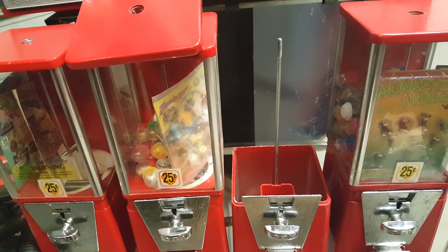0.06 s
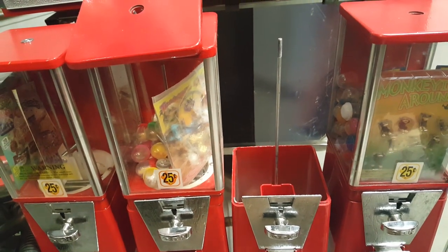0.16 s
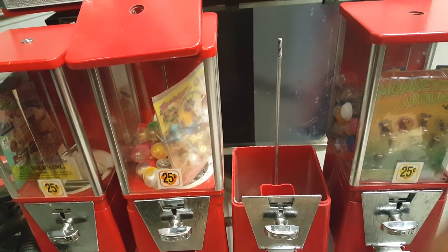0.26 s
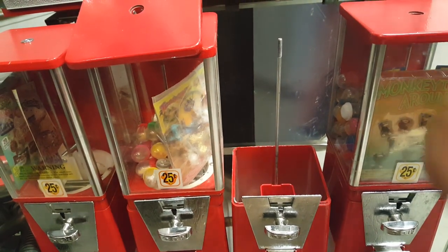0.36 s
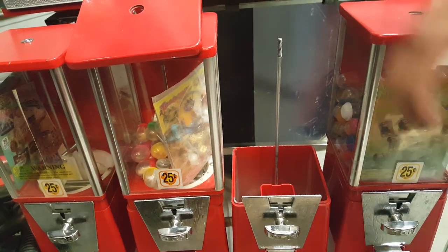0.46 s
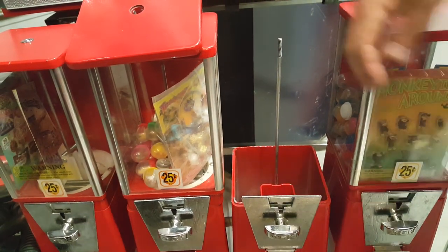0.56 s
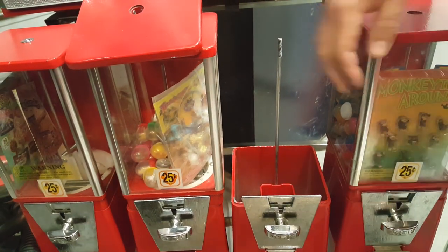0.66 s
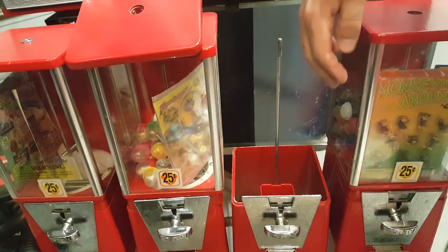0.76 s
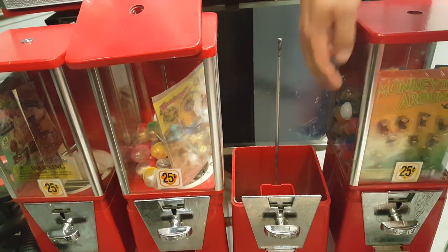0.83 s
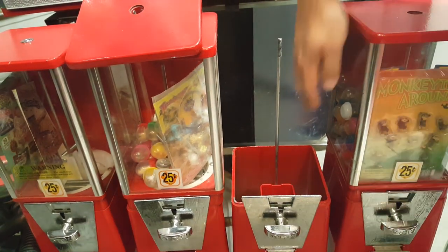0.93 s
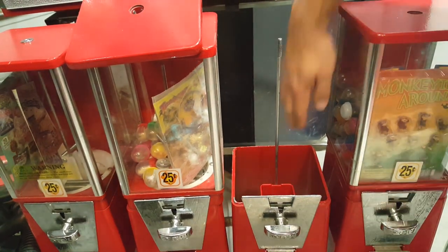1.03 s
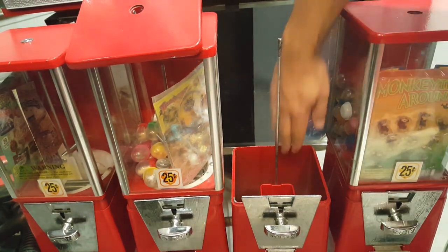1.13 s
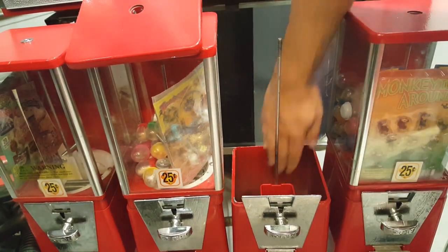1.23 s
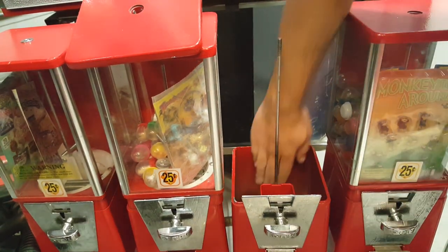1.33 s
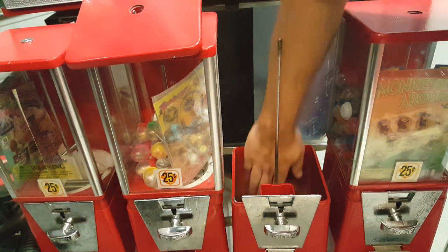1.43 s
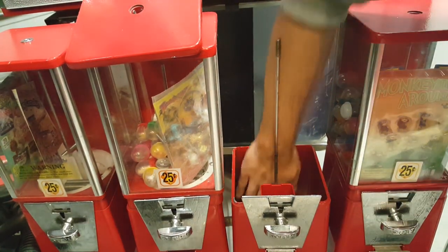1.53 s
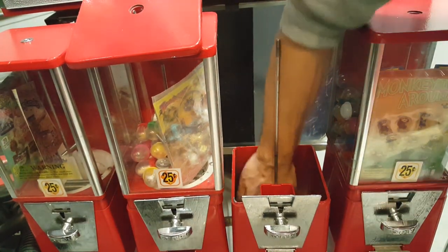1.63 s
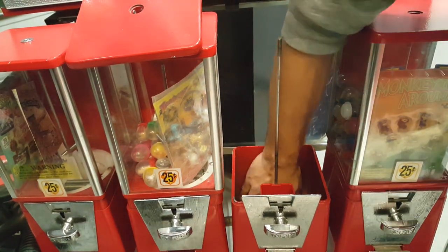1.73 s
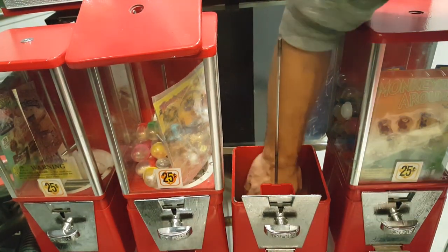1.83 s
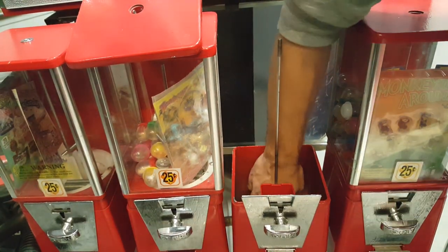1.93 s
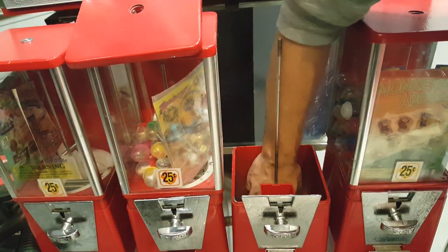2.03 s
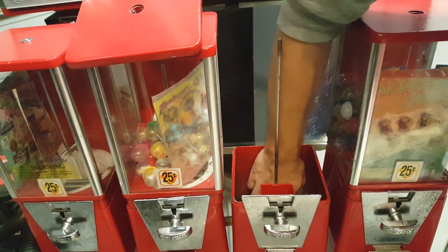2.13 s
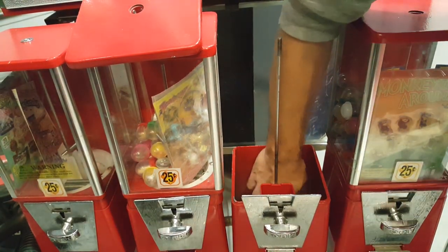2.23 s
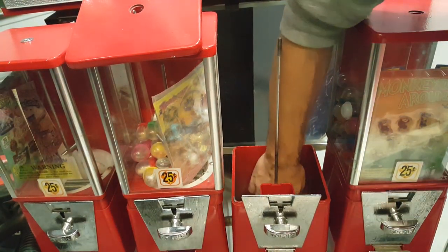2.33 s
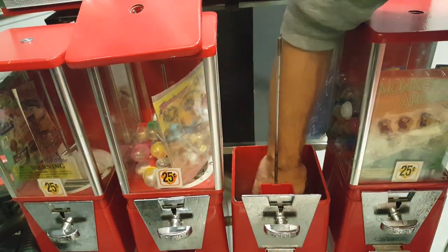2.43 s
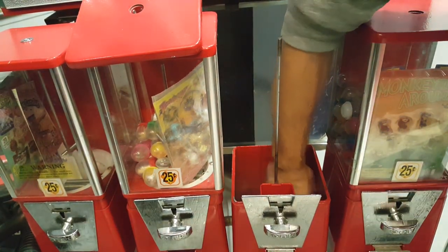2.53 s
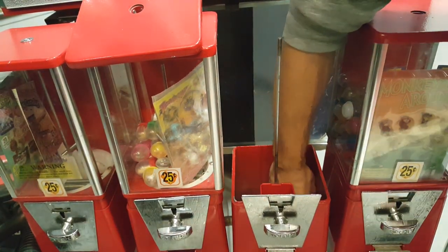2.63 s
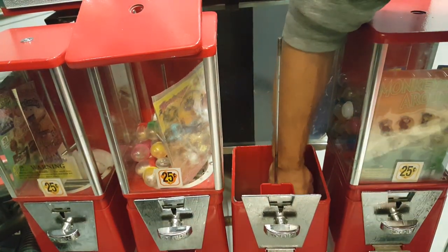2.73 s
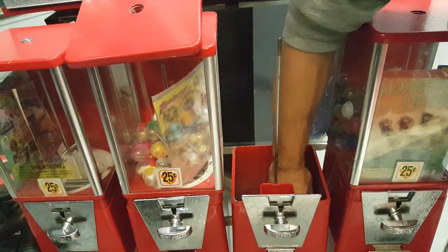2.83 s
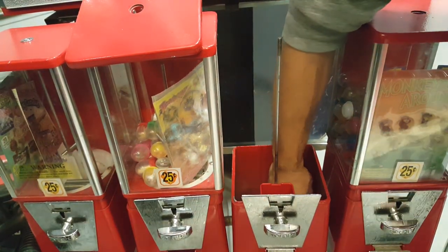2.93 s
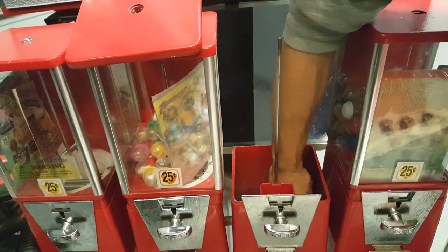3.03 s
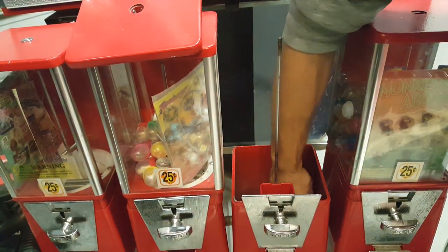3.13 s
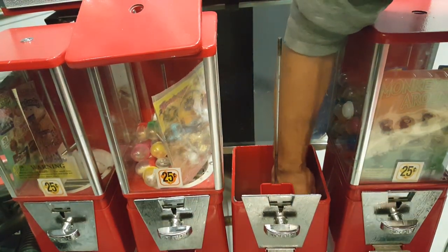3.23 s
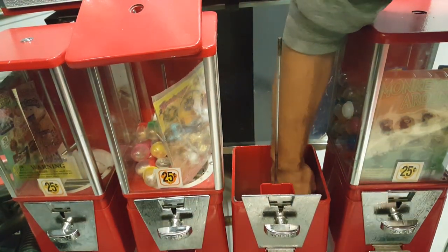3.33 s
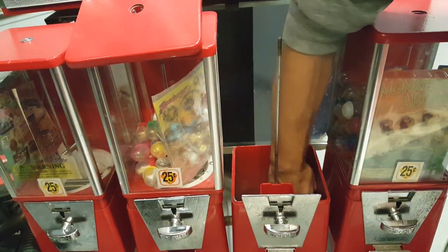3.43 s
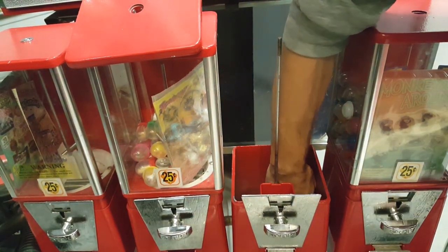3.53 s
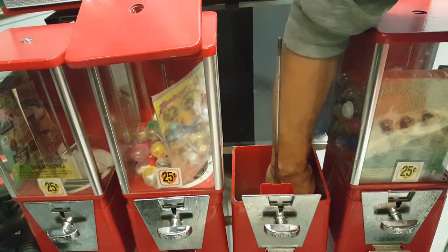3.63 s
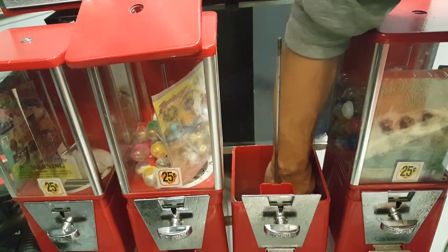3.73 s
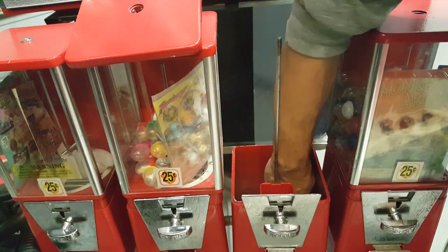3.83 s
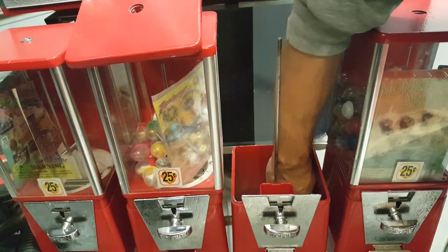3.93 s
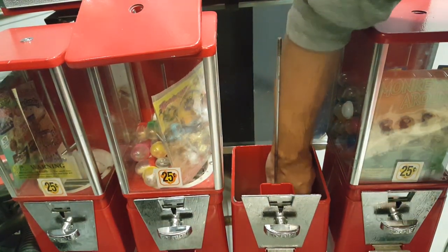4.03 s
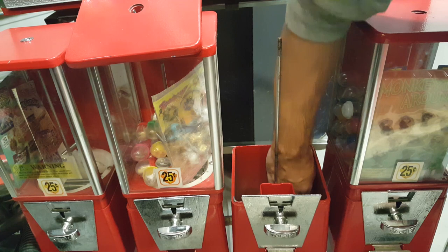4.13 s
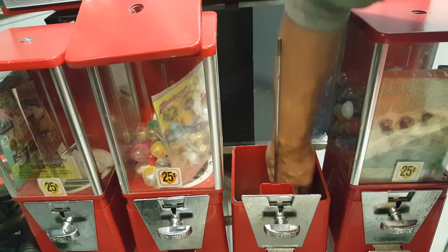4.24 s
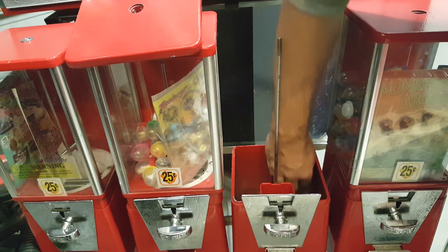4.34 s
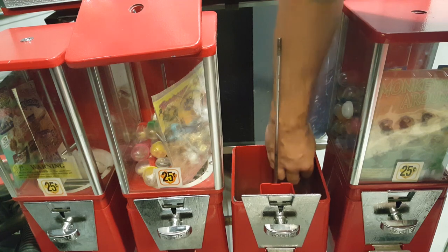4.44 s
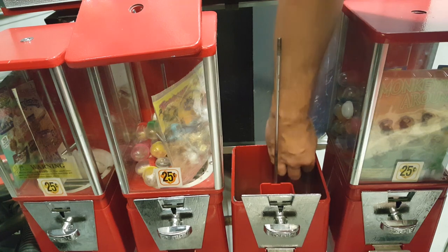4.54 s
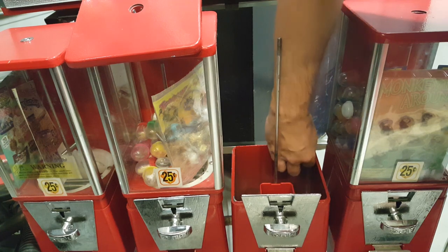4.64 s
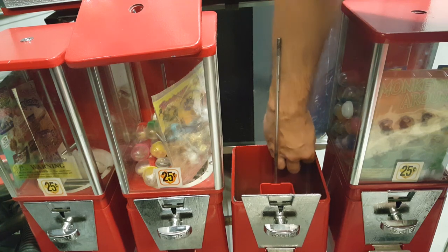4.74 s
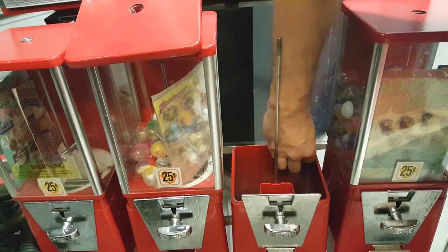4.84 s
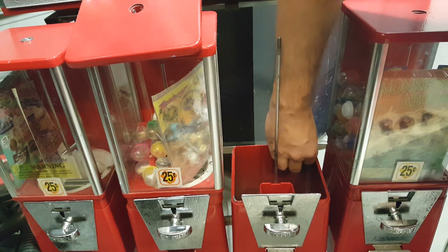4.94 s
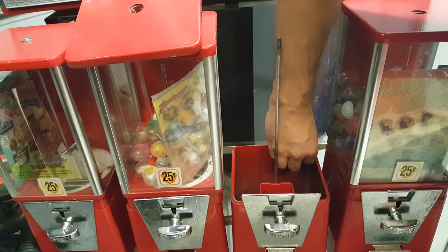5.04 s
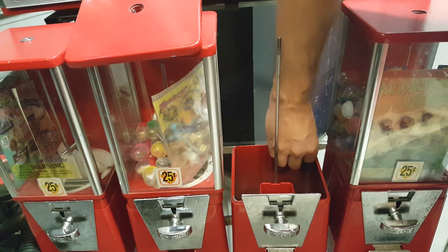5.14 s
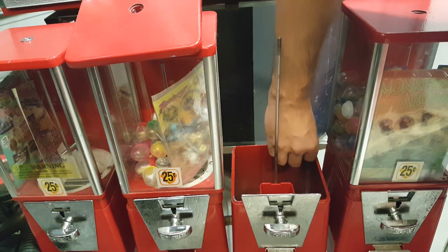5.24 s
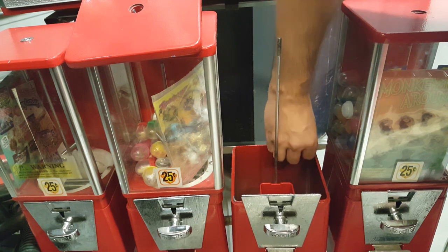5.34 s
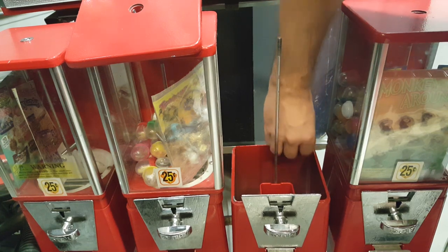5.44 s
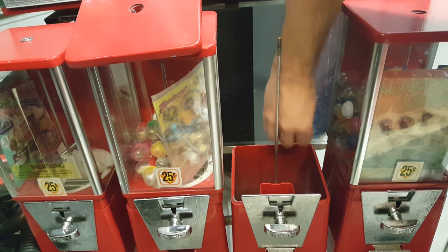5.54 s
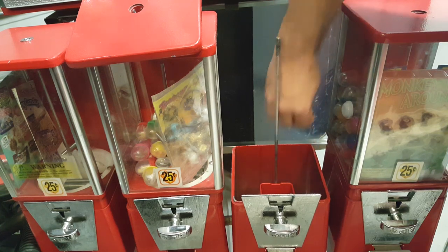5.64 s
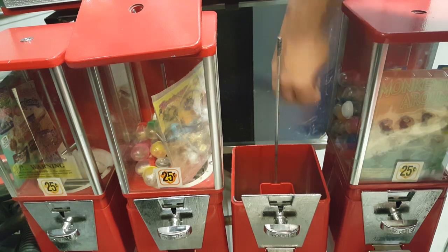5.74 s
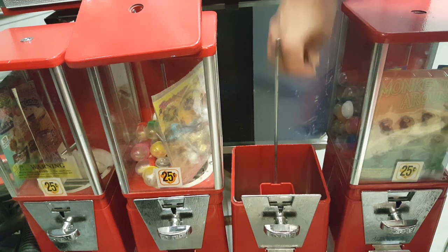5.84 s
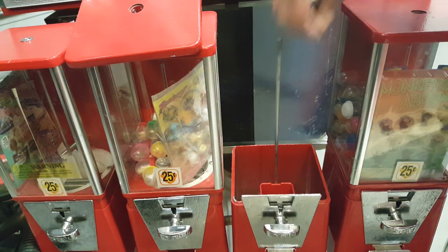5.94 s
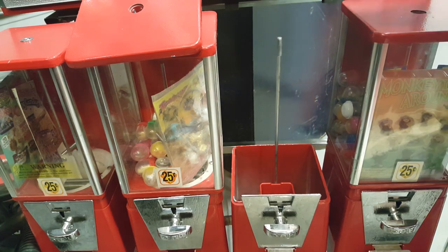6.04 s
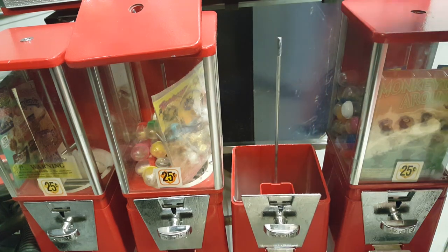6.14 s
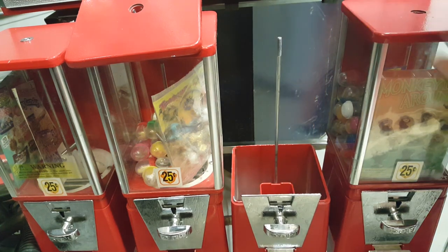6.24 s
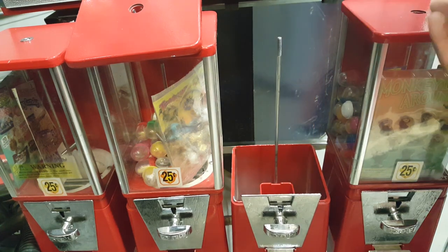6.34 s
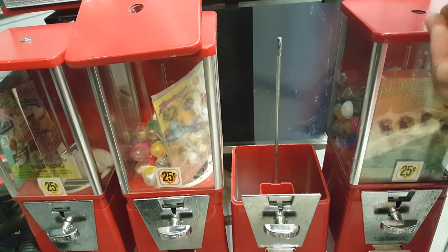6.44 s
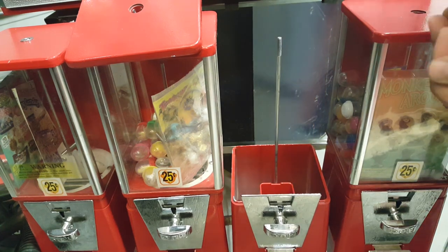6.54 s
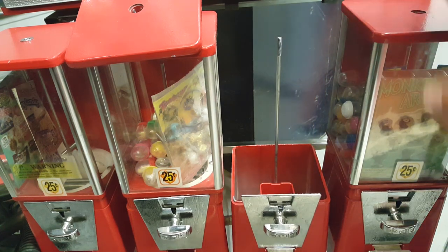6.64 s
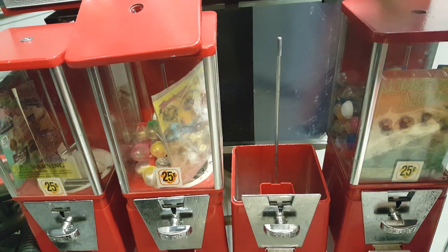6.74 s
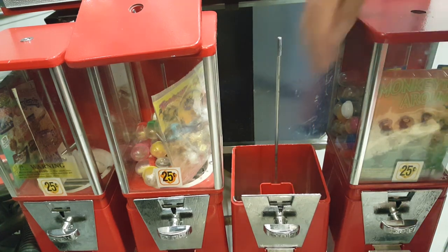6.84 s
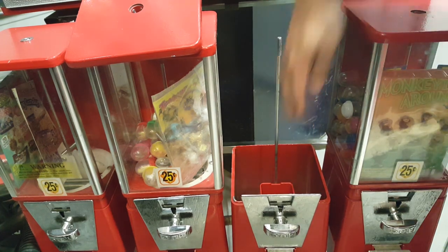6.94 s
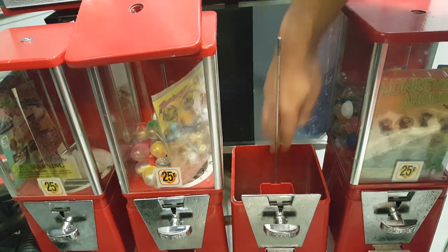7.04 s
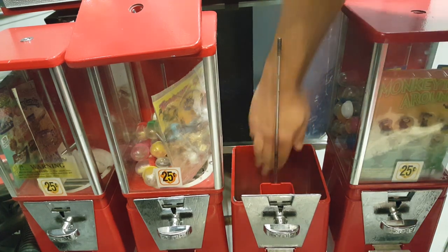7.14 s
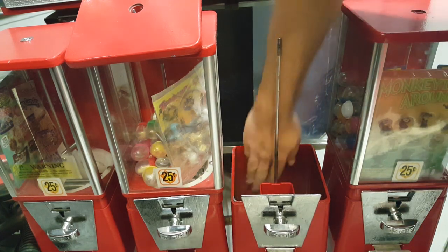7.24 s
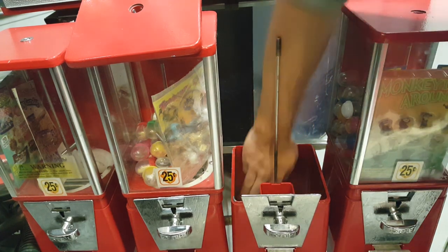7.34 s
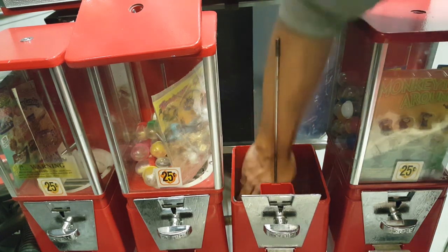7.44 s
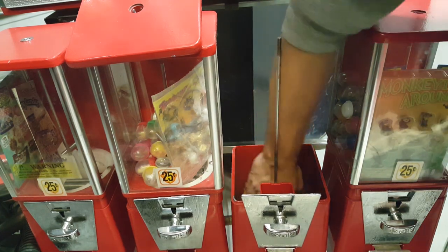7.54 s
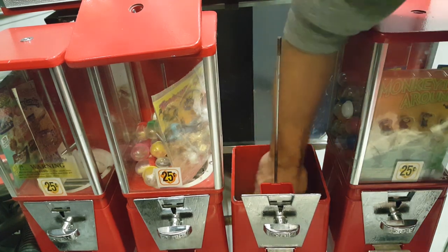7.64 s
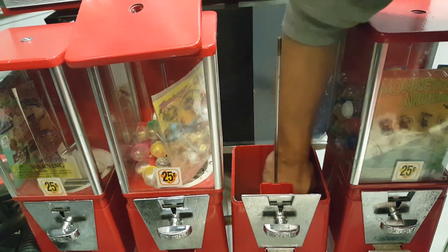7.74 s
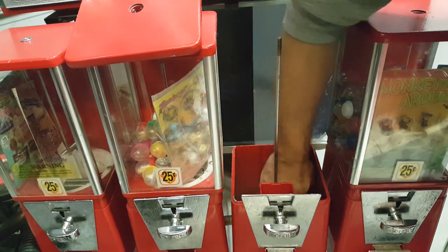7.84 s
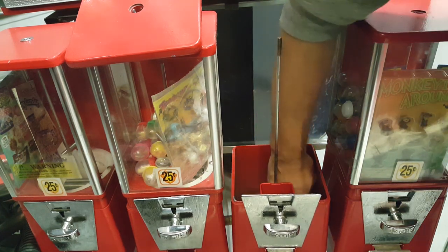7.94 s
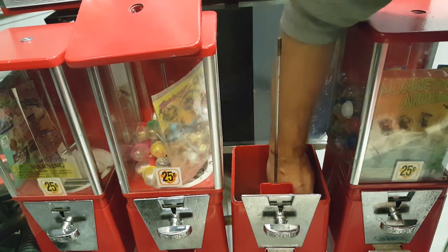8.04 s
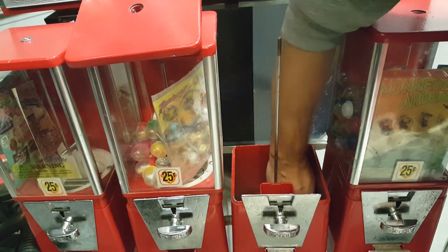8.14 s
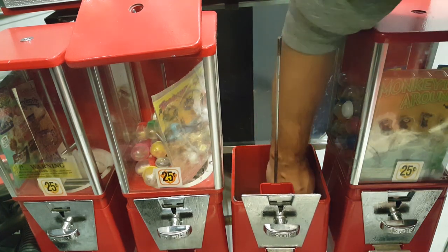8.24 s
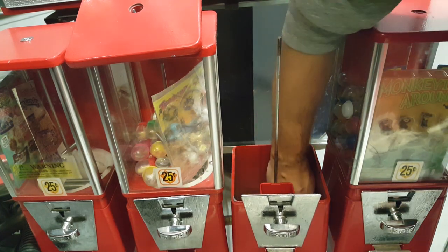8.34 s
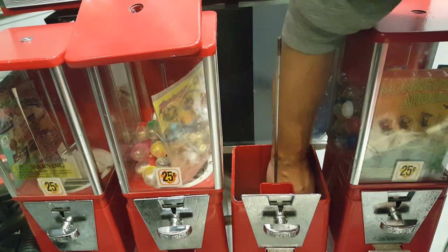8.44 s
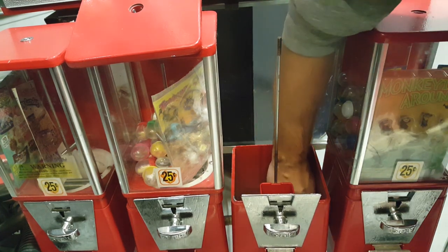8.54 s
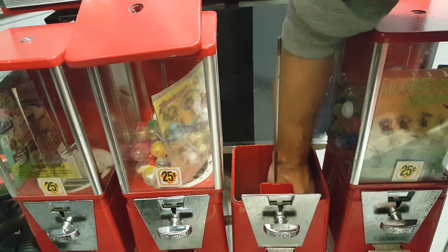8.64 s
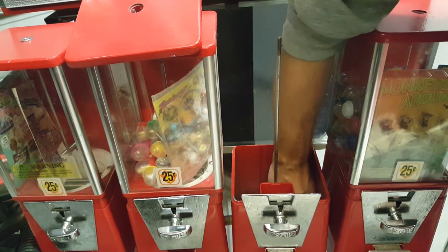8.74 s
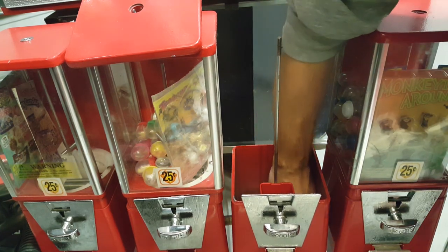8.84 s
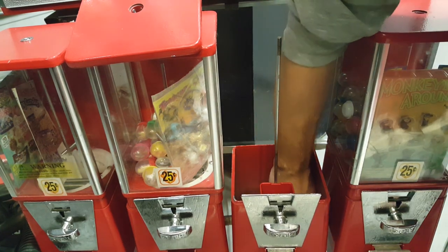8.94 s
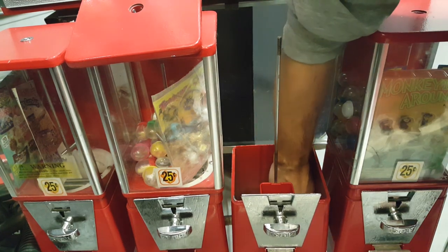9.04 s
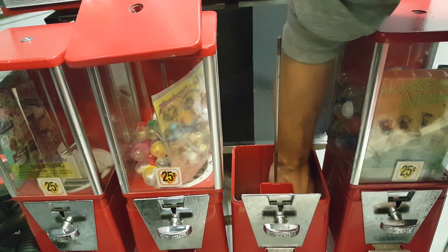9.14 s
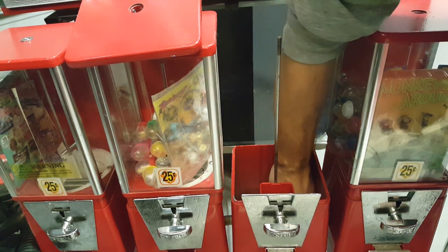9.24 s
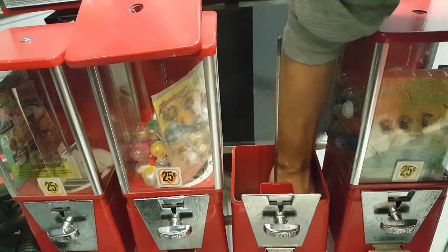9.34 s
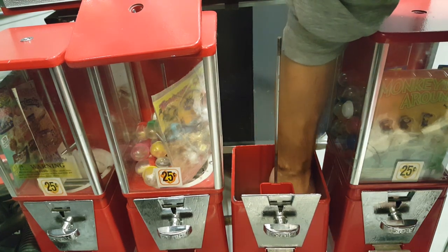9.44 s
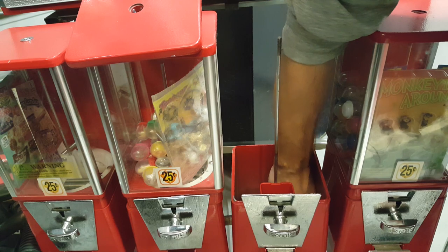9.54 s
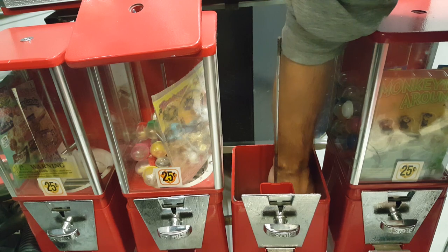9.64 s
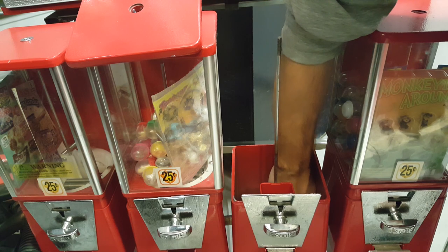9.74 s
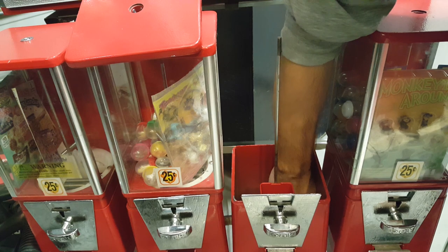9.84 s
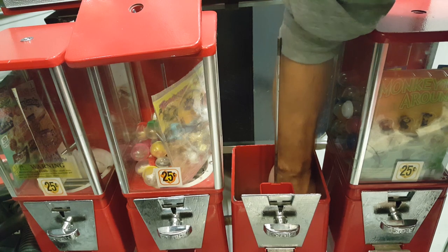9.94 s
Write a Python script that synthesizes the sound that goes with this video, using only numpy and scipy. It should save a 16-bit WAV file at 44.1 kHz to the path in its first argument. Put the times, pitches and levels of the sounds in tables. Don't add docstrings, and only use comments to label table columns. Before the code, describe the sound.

Close in a small quiet room with faint hum, a sleeve rustles and squeaks faintly, with one dull microphone bump. Fingers then rake a heap of coins in a sheet-metal box, a harsh clatter with hollow wall knocks. After a near-quiet lift, a fistful crashes into a deep tub, loose coins tick and ring in the palm, and a second noisy scoop follows, still going at the end.

```python
import sys
import numpy as np
from scipy import signal
from scipy.fft import rfft, irfft, next_fast_len
from scipy.io import wavfile
from scipy.ndimage import uniform_filter1d, minimum_filter1d

SR = 44100
rng = np.random.default_rng(int(sys.argv[2]) if len(sys.argv) > 2 else 0)


def to_wav(s):
    ch = np.atleast_2d(s).T
    pcm = np.round(np.clip(ch, -1, 1) * 32767)
    wavfile.write(sys.argv[1], SR, pcm.astype(np.int16))


def elevation(decibels):
    levels = np.asarray(decibels, float)
    return 10 ** (levels / 20)


N = 440118
TIME = np.arange(N) / SR


def unit(x):
    return x / np.sqrt(np.mean(x ** 2) + 1e-20)


def noise():
    return rng.standard_normal(N)


def along(points, hz):
    f, v = np.transpose(points)
    return np.interp(np.log(hz + 1), np.log(f + 1), v)


def filtered(x, response):
    m = next_fast_len(N + SR // 2)
    coarse = np.linspace(0, SR / 2, 2 ** 14)
    gain = response(coarse)
    gain = gain / np.sqrt(np.mean(abs(gain) ** 2))
    fine = np.fft.rfftfreq(m, 1 / SR)
    return irfft(rfft(x, m) * np.interp(fine, coarse, gain), m)[:N]


def colour(spectrum):
    return lambda hz: elevation(along(spectrum, hz))


def body(modes):
    def response(f):
        return sum((-1) ** k * elevation(db) * 1j * f * width / (centre * centre - f * f + 1j * f * width)
                   for k, (centre, width, db) in enumerate(modes))
    return response


def blows(rows):
    out = np.zeros((2, N))
    s, db, over_db = np.transpose(rows)
    out[:, np.round(s * SR).astype(int)] = elevation([db, db + over_db])
    return out


def dying(impulses, t60, rise):
    power = signal.lfilter([1], [1, -elevation(-120 / (t60 * SR))], impulses ** 2, axis=-1)
    keep = np.exp(-1 / (rise * SR))
    return np.sqrt(signal.lfilter([1 - keep], [1, -keep], power, axis=-1))


def patter(per_s, spread_db):
    chance, size = rng.random((2, N))
    return unit((chance < per_s / SR) * elevation(-spread_db * np.log(size + 1e-9)))


def strokes(rows, shape):
    t = TIME[::32, None]
    s, db, build, lose = np.transpose(rows)[:4]
    level_db = db - 20 * abs((t - s) / np.where(t < s, build, lose)) ** shape
    return np.interp(TIME, t[:, 0], level_db.max(axis=1))


def patchy(depth_db, bins, frames):
    z = signal.stft(noise(), nperseg=512)[2]
    field = uniform_filter1d(rng.standard_normal(z.shape), bins, 0)
    field = uniform_filter1d(field, frames, 1)
    return unit(signal.istft(z * elevation(depth_db * unit(field)), nperseg=512)[1][:N])


def rung(rows):
    out, t = np.zeros(N), TIME[:SR // 2]
    for s, hz, db, t60, caught in rows:
        damp = elevation(-60 * t / t60 - 60 * np.clip(t - caught + s, 0, None) / .04)
        out[round(s * SR):][:len(t)] += elevation(db) * damp * np.sin(2 * np.pi * hz * t)
    return out


def cash_box():
    # t/s, peak level/dB, box walls above it/dB
    early_clashes = [(1.7443, -15.5, -18.5), (1.775, -21.0, -21), (1.8296, -23, -10.5), (1.8544, -5.5, -13),
                     (1.8994, -2.5, -10.5), (1.9972, -18, -10), (2.0324, -5.5, 0.5), (2.071, -16.5, -6.5),
                     (2.1174, -16.5, -5.0), (2.1872, -14.0, -1), (2.2227, -24, -5), (2.2701, -14, -10),
                     (2.3194, -11.5, -16), (2.3473, -13, -1.5), (2.4172, -6.5, -0.5), (2.4484, -7, -5.5),
                     (2.541, -11, -1), (2.58, -9, 1), (2.723, -21.5, -18), (2.7901, -18.5, -5.5),
                     (2.831, -16, -15.0), (2.9091, -17.5, -3.0), (2.9316, -4, -16), (3.0165, -18, -11.5),
                     (3.0755, -20, -5.5), (3.1206, -16, -8), (3.1351, -2.5, -13), (3.1645, -12.5, -11.5),
                     (3.1835, 5.0, -6), (3.4032, -22, -6), (3.4564, -23.5, -7), (3.4715, -18, -6),
                     (3.5267, -12.5, -15.5), (3.568, -19.5, -15.5), (3.5901, -20.5, -13.0),
                     (3.64, -24.5, -9.5), (3.694, -11.5, -5), (3.716, -12.0, 3), (3.7541, -14.5, -2),
                     (3.8091, -15.5, -10.5), (3.8365, -20.5, -6.5), (3.8529, -12, -4), (3.913, -10.0, 2.5),
                     (3.97, -27.5, 8), (3.9942, -23.5, 4), (4.0176, -18.0, 7), (4.0729, -17, -22.5),
                     (4.1957, -27, -5.5), (4.24, -28.5, -2.5), (4.2683, -7, -16), (4.32, -18, -8),
                     (4.3825, -17, -22.0)]
    late_clashes = [(7.646, -17, -11.5), (7.695, -7.5, -1.0), (7.743, -5.5, -7), (7.7758, 2, -1.5),
                    (7.91, -19.0, -10.0), (7.9733, -11, -21.5), (8.019, -16.5, -7), (8.047, -20, -14),
                    (8.2138, -19.5, 2.5), (8.2627, -13, 0), (8.311, 1, -6), (8.3441, -3, -3.5),
                    (8.385, -9.5, 2.0), (8.411, -6, -4.5), (8.4748, -18, -9), (8.6377, -12, 8),
                    (8.67, -12.5, 3), (8.7, -2, -5.5), (8.735, 4, -3.5), (8.7864, -8.0, -4.5),
                    (8.9446, -15, -7.5), (8.97, -14.5, -3), (9.014, -19.5, 1), (9.0376, -5.5, -5),
                    (9.2239, -21, -19.0), (9.267, -16.5, -8.0), (9.287, -16, -13.0), (9.297, -14, -13),
                    (9.406, -32.5, 3.5), (9.49, -18, -9), (9.512, -25, 0.0), (9.5464, -16.5, 2.5),
                    (9.5775, -20, -11), (9.7003, -28.0, -12.5), (9.7278, -28, 5.5), (9.766, -19.5, -5.5),
                    (9.791, -10.5, -5), (9.8417, -24.0, -4), (9.8732, -17.0, -1.5), (9.919, -18, -5),
                    (9.951, -20.5, -4)]
    # t/s, peak level/dB, box walls above it/dB
    slips = [(1.337, -27, -11.5), (1.3506, -23.5, 2), (7.5142, -44.5, 20), (7.566, -34, 4.5),
             (4.578, -28, -1), (4.678, -32.5, -1.5), (4.814, -27.5, -12), (4.9647, -42.5, -12),
             (5.003, -35.5, -6), (5.0634, -41.5, -2.5), (5.2, -50, -15), (5.2625, -46.5, 10),
             (5.32, -43.5, 8), (5.469, -41, -3)]
    # t of most force/s, clash level/dB, build by 20 dB/s, loss of 20 dB/s
    pushes = [(1.76, -34, -0.5, 1), (1.92, -24, 0.06, .5), (2.3, -25.5, 0.3, -0.2),
              (2.6, -19.5, 0.57, 0.16), (2.78, -36.5, -0.3, .4), (2.95, -28.5, 0.02, 0.27),
              (3.22, -15.5, 0.03, 0.14), (3.42, -26.5, 0.07, 0.13), (3.53, -23.5, 0.14, 0.1237),
              (3.72, -21, .07, .07), (3.87, -22.5, 0.13, 0.116), (4.03, -27.5, 0.33, .04),
              (4.2, -25, 0.08, 0.26), (4.36, -27.5, 0.23, 0.2), (5.02, -59, 0.1336, 0.1),
              (5.33, -65, 0.31, 0.5), (7.67, -25.5, 0.24, .3), (7.8, -20.5, 0.3647, 0.18),
              (8.04, -42, 0.39, 0), (8.23, -41.5, -0.2, 17), (8.41, -19.5, 0.15, 0.1),
              (8.77, -19, 0.1, 0.17), (9.045, -21, 0.13, 0.22), (9.29, -35.5, 0, 0.14),
              (9.57, -33.5, 0.05, 0), (9.8, -38, 0.18, -1), (9.89, -33.5, 0.04, 2.1)]
    # from/s, to/s
    in_heap = [
        (1.735, 5.6),
        (7.64, 10),
    ]
    lift = (4.04, 4.2, 4.5, 6)
    # t/s, f/Hz, level/dB, t60/s
    panels = [
        (1.35, 398, -24.5, 0.18),
        (5.319, 588, -28.5, 0.13),
        (5.467, 1066, -43, 0.27),
        (5.466, 1725, -40, .17),
        (7.516, 1630, -29.5, 0.059),
        (7.567, 2160, -27.5, 0.027),
        (7.567, 4040, -42, 0.049),
    ]
    # t/s, f/Hz, level/dB, t60/s
    surface = [(2.07, 15450, -32, .2), (2.28, 15450, -32.5, .15), (2.832, 15050, -40, 0.23),
               (2.54, 6900, -21, 0.11), (3.136, 10350, -28, .15), (3.641, 9550, -22.5, 0.12),
               (4.27, 9480, -27, .2), (8.945, 8600, -28.5, .06), (9.225, 9030, -30, .15),
               (4.815, 7100, -39.5, 0.091), (4.815, 10900, -41.5, 0.11)]
    slide = unit(dying(patter(per_s=900, spread_db=1.8), t60=.025, rise=.0006))
    push_db = strokes(pushes, shape=1.03)
    walls_db = -29 + 0.72 * (push_db + 27.5)
    inside = sum((TIME > a) * (TIME < b) for a, b in in_heap)
    clash, hum_of_walls = elevation([push_db - 3.5, walls_db]) * inside * slide
    edge, wall = blows(early_clashes + slips + late_clashes)
    hit = dying(edge, t60=0.042, rise=0.0021)
    knock = dying(wall, t60=.022, rise=.0003)
    free = np.interp(TIME, lift, [0, 1, 1, 1], 0, 0)
    soft = np.interp(TIME, lift, [0, 0, 1, 1], 0, 0)
    force = np.hypot(clash, elevation(-6.5) * hit)
    drive = np.hypot(elevation(-1.5) * hum_of_walls, elevation(1.5) * knock) * patchy(depth_db=5, bins=2, frames=6)
    ringing = rung([(*row, N / SR) for row in panels + surface])
    return heap(force, soft) + box_walls(drive, free) + ringing


def heap(force, soft):
    # f/Hz, level per Hz/dB
    clash_colour = [(88, -53), (150, -21.5), (383, -8), (566, -20.5), (888, -7), (1020, -18.5), (1420, 2.5),
                    (1790, -4.5), (9440, -7), (16000, -24.5)]
    # f/Hz, level per Hz/dB
    slip_colour = [(700, -17.5), (1700, 2.5), (4000, -4.5), (9700, -16), (16000, -34.5)]
    rasp = force * patchy(depth_db=3, bins=12, frames=3)
    broad = elevation(2.0) * filtered((1 - soft) * rasp, colour(clash_colour))
    broad += elevation(1.0) * filtered(soft * rasp, colour(slip_colour))
    stacks = elevation(-10) * clinks(force, count=2000, t60=.035)
    return brightened(broad + stacks + elevation(-8.0) * chimes(force), force)


def chimes(force):
    # f/Hz, width/Hz, level/dB
    coin_modes = [(5120, 61, -4), (5370, 320, 5.5), (6750, 110, 7.5), (9050, 200, -2), (10520, 380, 3.5),
                  (11800, 480, 4)]
    return filtered(force * patchy(depth_db=4.5, bins=8, frames=3), body(coin_modes))


def clinks(force, count, t60):
    when, pitch, size = rng.random((3, count, 1))
    start, step = (when * N).astype(int), np.arange(1024)
    hz = 1000 * 14 ** pitch
    level = elevation(-3 * np.log(size + 0.0027) - 60 * step / SR / t60)
    tone = force[start] * level * np.sin(2 * np.pi * hz * step / SR)
    return np.bincount((start + step).ravel(), tone.ravel())[:N]


def brightened(x, force):
    bright_hz, full_db, dulling = 7030, -29.5, 0.27
    low = signal.lfilter(*signal.butter(1, bright_hz, fs=SR), x)
    strength = abs(uniform_filter1d(force, size=128)) / elevation(full_db)
    return low + (x - low) * np.minimum(strength, 2) ** dulling


def box_walls(drive, free):
    # f/Hz, width/Hz, level/dB
    held_modes = [(382.5, 59, -1), (565, 45.5, 1.5), (1240, 150, -8.5), (1998, 160, -6), (2423, 310, -4),
                  (2770, 155, -4), (3427, 130, -7.5)]
    # f/Hz, width/Hz, level/dB
    free_modes = [(377, 63, 4), (568, 45, 10.5), (1120, 110, -3), (1590, 110, 2.5), (1700, 110, 0.5),
                  (716, 90, -5), (2270, 98, -11.5), (2626, 180, -4.5), (2870, 97, -6), (3835, 120, -10)]
    # f/Hz, width/Hz, level/dB
    side_modes = [(750, 120, -7.5), (880, 69, 0)]
    bottom_modes = [(1404, 83, 1), (1502, 160, -2), (1622, 90, -2)]
    # t/s, side wall level/dB, bottom level/dB
    grip = [(1.7, -16.5, -8.5), (2.1, -13.5, -7), (2.5, -6.5, -6.5), (2.8, -9, -12.5), (3.2, -9, -13.5),
            (3.45, -15.5, -6.5), (4.0, -16, 0), (4.35, -23, -1), (4.55, -21, -16.5), (7.5, -4.5, -5),
            (8.0, -8, -11), (8.35, -6, -6), (8.75, -5, -2), (9.05, -9.5, -9.5), (9.35, -10, -8.5),
            (9.55, -6.5, -1), (9.98, -9, -4)]
    sheet = elevation(-3) * filtered((1 - free) * drive, body(held_modes))
    sheet += elevation(2.5) * filtered(free * drive, body(free_modes))
    s, side_db, bottom_db = np.transpose(grip)
    for db, modes in ((side_db, side_modes), (bottom_db, bottom_modes)):
        sheet += filtered(elevation(np.interp(TIME, s, db)) * drive, body(modes))
    thud = elevation(-24.5) * filtered(drive, body([(90, 19, 0.0035), (200, 200, 0.014)]))
    return sheet + thud


def rims():
    # t/s, peak level/dB
    rim_ticks = [(1.738, -17), (1.7764, -9), (1.8297, -12.5), (1.8861, -12), (1.9974, -18),
                 (2.0178, -13.5), (2.0712, -13), (2.1176, -15), (2.169, -16.5), (2.269, -9),
                 (2.2762, -11.5), (2.4069, -13.5), (2.7237, -17), (2.7681, -23.5), (2.8923, -18),
                 (3.017, -16.5), (3.076, -16), (3.1358, -12.5), (3.1837, -11), (3.4925, -20.5),
                 (3.5274, -14), (3.6237, -18), (3.6401, -18), (3.703, -11.5), (3.7534, -13.5),
                 (3.8092, -19.5), (3.8362, -15.5), (3.8526, -14), (3.912, -16), (3.9938, -17.5),
                 (4.0731, -16), (4.1081, -27.5), (4.2682, -11.5),
                 (7.6465, -15), (8.0167, -18), (8.046, -19), (8.1409, -40), (8.192, -29.5), (8.395, -12),
                 (8.4746, -19), (8.5014, -21), (8.5465, -26), (8.6692, -21), (8.699, -14), (8.735, -15),
                 (9.0114, -15), (9.2239, -16.5), (9.2688, -15), (9.3387, -26), (9.4389, -44), (9.4624, -38),
                 (9.4883, -15), (9.5527, -17), (9.5741, -20), (9.639, -28), (9.6799, -34), (9.7018, -24.5),
                 (9.793, -14.5), (9.8755, -12),
                 (4.4982, -42), (4.7092, -48), (4.7845, -57), (4.8135, -28.5), (4.8814, -56),
                  (5.1274, -65), (5.1996, -48), (5.2294, -59), (5.2445, -50), (5.4026, -61), (5.6989, -54),
                  (5.7634, -53)]
    # f/Hz, level per Hz/dB
    rim_colour = [(1500, -42), (4000, -14), (6500, -4.5), (10000, 1), (13000, -3), (16000, -18)]
    s, db = np.transpose(rim_ticks)
    tick = dying(blows(np.transpose([s, db, 0 * db]))[0], t60=0.043, rise=.001)
    return elevation(-8) * filtered(tick * noise(), colour(rim_colour))


def tub():
    # t/s, peak level/dB, tub above it/dB
    landings = [
        (5.9277, -27.5, 2),
        (5.9618, -23, 5.5),
        (5.9937, -0.5, -7.5),
        (6.0243, 2, 1.5),
    ]
    # t/s, clash level/dB, build by 20 dB/s, loss of 20 dB/s
    tipping = [
        (5.97, -47, 0.2, 0.7),
        (6.02, -21, 0.0561, 0.1658),
    ]
    booming = [
        (6.04, -25, .17, .2),
    ]
    # f/Hz, width/Hz, level/dB
    tub_modes = [(362, 45, -1.5), (540, 275, -8), (764, 356, -9), (1220, 73, -12.5), (1490, 120, -17)]
    # f/Hz, level per Hz/dB
    pour_colour = [(150, -56), (286, -52), (354, -4), (504, -17), (805, -24.5), (5250, -23), (11700, -31),
                   (16000, -42)]
    slide = unit(dying(patter(per_s=500, spread_db=2.5), t60=.03, rise=.0006))
    pour = elevation([strokes(tipping, shape=1.43), strokes(booming, shape=1.43)])
    hits = dying(blows(landings), t60=0.072, rise=0.0012)
    clash, boom = np.hypot(elevation(-2.5) * pour * slide, elevation(-6) * hits)
    coins = elevation(1.0) * filtered(clash * patchy(depth_db=1.5, bins=10, frames=3), colour(pour_colour))
    return coins + elevation(2.0) * filtered(boom * noise(), body(tub_modes))


def palm():
    # t/s, peak level/dB, ring above it/dB
    ticks = [(6.3493, -34, 0), (6.362, -36, -2), (6.4107, -25, -5), (6.427, -27.5, 0), (6.44, -29, -5),
             (6.451, -27, -5), (6.5, -20, -5.5), (6.527, -21, 0.5), (6.562, -22, 3), (6.61, -36, -9),
             (6.6242, -36, -15), (6.64, -36, -15), (6.6746, -34, -15), (6.6985, -34, -10),
             (6.7285, -25.5, -5.5), (6.3766, -38.5, 23.5), (6.4033, -30, -4.5), (6.4608, -17, 4),
             (6.4804, -17, -5), (6.5176, -17, -2), (6.5495, -19.5, 10), (6.5877, -30, -7),
             (6.7176, -28.5, 21.5), (6.7441, -20.5, 2.5), (6.7975, -18.5, -18), (6.8713, -34, -21),
             (6.9213, -36.5, 5.5), (7.1636, -36, -19), (7.1751, -47, -13), (7.211, -37, -8),
             (7.2492, -39, -13), ]
    # t/s, level/dB, build by 20 dB/s, loss of 20 dB/s
    flicks = [
        (6.4, -32, 0.02, 0.22),
        (6.555, -32.5, 0.1054, 0.0955),
        (6.74, -35, 0.01, 0.15),
    ]
    # f/Hz, level per Hz/dB
    palm_colour = [(710, -53), (1200, -30.5), (2130, -11.5), (5970, -4), (7660, -6), (9310, -3),
                   (14200, -7.5), (16000, -9.5)]
    # f/Hz, width/Hz, level/dB
    loose_modes = [(8640, 60, -5), (8830, 25, 4.5), (9530, 55, 4), (10200, 80, -12.5), (9800, 100, -2.5),
                   (16600, 53, -2.5)]
    # t/s, f/Hz, level/dB, t60/s, caught at/s
    rings = [
        (2.275, 9300, -22, .3, 2.335),
        (6.415, 15004, -33, .25, 6.46),
        (6.403, 9520, -22, .2, 6.46),
        (6.508, 9444, -25.5, 0.55, 6.6),
        (6.527, 15004, -25, 0.25, 6.58),
        (6.527, 8839, -36, 4.1, 6.61),
        (6.61, 8839, -31, 9, 6.71),
        (6.719, 15004, -29, 0.73, 6.79),
    ]
    shake = elevation(strokes(flicks, shape=0.87))
    tick, ring = dying(blows(ticks), t60=0.016, rise=.0002)
    chatter = shake * unit(dying(patter(per_s=190, spread_db=3), t60=0.019, rise=0.00053))
    contact = np.hypot(elevation(-2.5) * tick, elevation(-2.0) * chatter)
    bending = np.hypot(elevation(-6.5) * ring, elevation(-0.5) * chatter)
    dry_ticks = filtered(contact * patchy(depth_db=5.5, bins=30, frames=2), colour(palm_colour))
    return dry_ticks + filtered(bending * noise(), body(loose_modes)) + rung(rings)


def sleeve():
    # t/s, rustle level/dB, build by 20 dB/s, loss of 20 dB/s, drag above it/dB
    moves = [
        (.19, -56, 0.08, 0.2, -7.5),
        (.45, -57, 0.2, 0.5, 5.5),
        (.66, -50, 0.08, 0.29, 10.5),
        (.94, -50, 0.16, 0.64, 3),
        (1.352, -53, 0.28, 0.3, 11),
        (1.628, -66.5, -0.8, 1, 8),
        (7.45, -64.5, 0.37, 4, 6),
        (7.57, -61.5, .08, 1.1, 15),
    ]
    # t/s, peak level/dB, drag above it/dB
    snags = [
        (0.1496, -51.5, -3),
        (0.1975, -40.5, -22),
        (0.3132, -45, -13),
        (0.5916, -32, 7),
        (0.636, -32.5, 10.5),
        (0.7205, -36, -8),
        (0.7866, -40, 4),
        (0.9097, -33.5, -21.5),
        (1.612, -47.5, 3),
    ]
    # f/Hz, level per Hz/dB
    rustle_colour = [(880, -16.5), (1500, 3), (2660, 3), (4460, 1), (5490, -1), (11900, -7.5), (14600, -21),
                     (16000, -41)]
    # f/Hz, level per Hz/dB
    drag_colour = [(47, -17.5), (80, -3.5), (124, -13), (343, 5), (566, -2), (1230, -8), (3000, -27.5),
                   (6600, -120)]
    # f/Hz, width/Hz, level/dB
    cuff = [(4400, 740, 0)]
    fibres = unit(dying(patter(per_s=900, spread_db=1.5), t60=.02, rise=.001))
    drags = [(s, db + over_db, build, lose) for s, db, build, lose, over_db in moves]
    effort = elevation([strokes(moves, shape=1.2), strokes(drags, shape=1.4)])
    catches = dying(blows(snags), t60=0.15, rise=0.00042)
    rustle, drag = np.hypot(effort * fibres, elevation(-8.0) * catches)
    out = filtered(rustle * noise(), colour(rustle_colour)) + filtered(drag * noise(), colour(drag_colour))
    out += elevation(-13.0) * filtered(rustle * noise(), body(cuff))
    squeak = whine()
    out[:len(squeak)] += squeak
    return out


def drift(t):
    return np.interp(t, np.arange(90) / 8, rng.standard_normal(90))


def whine():
    # t/s, ribs per s/Hz, gain of the slack/s, loss of the slack/s, flatness
    sweeps = [
        (.495, 1070, .125, 0.22, 1.7),
        (.885, 1340, .225, 0.16, 2.1),
        (1.22, 1287, 0.21, 0.19, 2.4),
    ]
    # multiple of the rib rate, level/dB
    partials = [(8, -10), (9, -2), (10, -5), (11, -6), (12, 0), (13, -6), (14, -9)]
    slack = 0.33
    touch_s, leave_s, fade_s = 0.38, 1.7, .02
    whine_db, easing_db_per_s, slow_db = -62.5, 5, 10
    s, hz, before, after, flat = np.transpose(sweeps)
    t = TIME[:2 * SR]
    away = abs((t[:, None] - s) / np.where(t[:, None] < s, before, after))
    arcs = hz * (1 - slack * away ** flat)
    now, ribs = arcs.argmax(axis=1), np.maximum(arcs.max(axis=1), 1)
    touch = np.clip(np.minimum(t - touch_s, leave_s - t) / fade_s, 0, 1)
    uneven = 1 + 0.0043 * uniform_filter1d(noise()[:len(t)], size=40)
    turns = 2 * np.pi * np.cumsum(ribs * uneven) / SR
    tone = sum(elevation(level + 6 * drift(t)) * np.sin(k * turns) * (k * ribs < 14800) for k, level in partials)
    return tone * touch * elevation(whine_db - easing_db_per_s * t - slow_db * (1 - ribs / hz[now]))


def housing():
    # t/s, peak level/dB, f/Hz, t60/s
    bumps = [
        (0.809, -22, 1910, 0.01),
        (.811, -9, 312, 0.013),
        (0.822, -26, 90, 0.046),
        (0.82, -17, 925, 0.01),
        (5.702, -36, 300, 0.024),
        (5.767, -36, 346, 0.022),
        (5.898, -21, 200, 0.02),
        (6.794, -30, 220, 0.029),
        (6.801, -30.5, 71, 0.078),
        (8.183, -30, 200, 0.032),
    ]
    out, t = np.zeros(N), TIME[:SR // 5]
    for s, db, hz, t60 in bumps:
        out[round(s * SR):][:len(t)] -= elevation(db - 60 * t / t60) * np.sin(2 * np.pi * hz * t)
    return out


def room(x):
    # f/Hz, t60/s
    tail_t60 = [(200, 0.24), (2000, 0.19), (12000, 0.098)]
    hz, t, z = signal.stft(rng.standard_normal(SR // 2), SR, nperseg=256)
    decay = elevation(-60 * t / along(tail_t60, hz)[:, None])
    tail = signal.istft(z * decay, SR, nperseg=256)[1]
    return signal.fftconvolve(np.pad(x, (300, 0)), tail / np.linalg.norm(tail))[:N]


def hum():
    # t/s, level/dB
    hum_level = [
        (0, -65),
        (.55, -61),
        (9.98, -56.5),
    ]
    # f/Hz, level per Hz/dB
    hum_colour = [(20, -25), (26, -14), (96, -4.5), (234, -7), (499, -14), (642, -17.5), (8410, -36.5),
                  (13000, -37.5), (16000, -56.5)]
    s, db = np.transpose(hum_level)
    return elevation(np.interp(TIME, s, db) - 0.5) * filtered(noise(), colour(hum_colour))


def scene():
    near = cash_box() + rims() + tub() + palm() + sleeve()
    far = elevation(-8) * room(near)
    return (near + far + housing() + hum())[None]


def roll_off(x):
    return signal.sosfilt(signal.butter(12, 16480, fs=SR, output="sos"), x)


def record(dry):
    ceiling, top_hz = .31, 15850
    need = minimum_filter1d(1 / np.maximum(abs(dry) / ceiling, 1), size=221, axis=1)
    held = dry * uniform_filter1d(need, size=111, axis=1)
    m = next_fast_len(N)
    held = irfft(rfft(held, m) * (np.fft.rfftfreq(m, 1 / SR) < top_hz), m)[:, :N]
    return roll_off(held)


dry = scene()
out = record(dry)
to_wav(out)
```